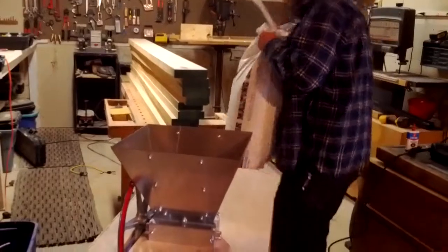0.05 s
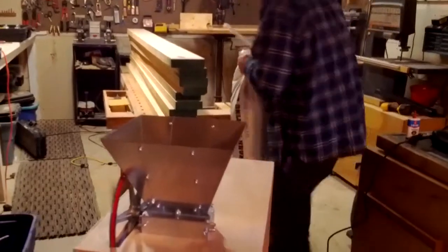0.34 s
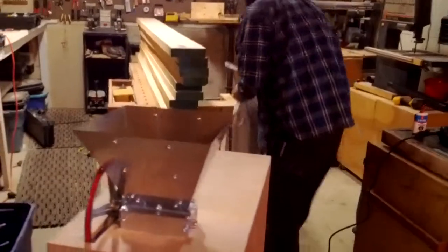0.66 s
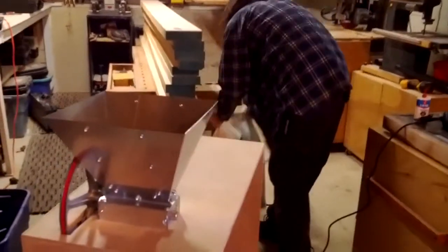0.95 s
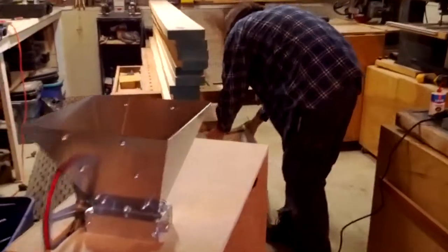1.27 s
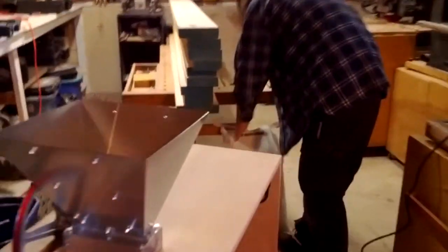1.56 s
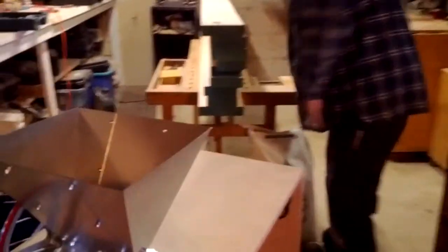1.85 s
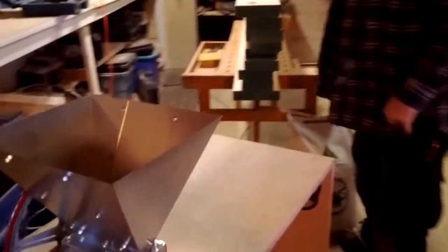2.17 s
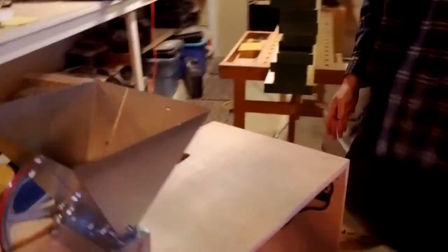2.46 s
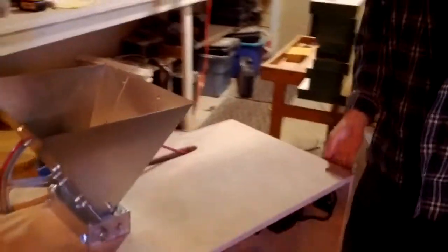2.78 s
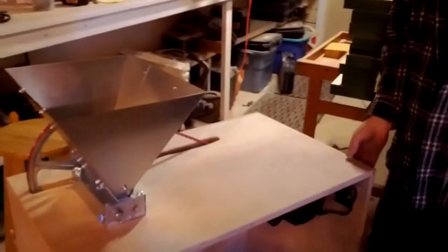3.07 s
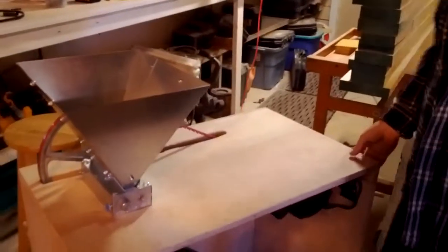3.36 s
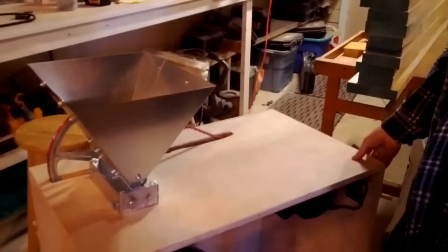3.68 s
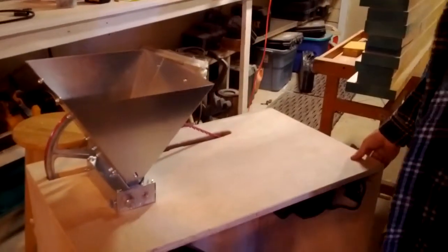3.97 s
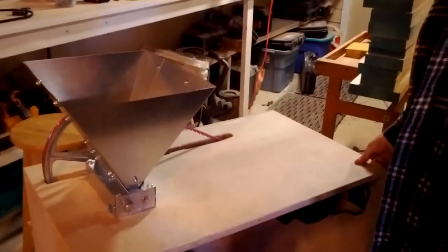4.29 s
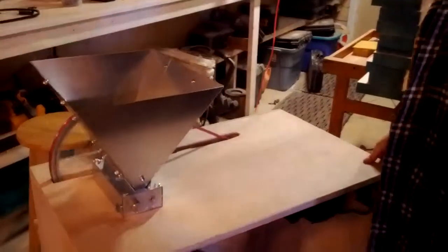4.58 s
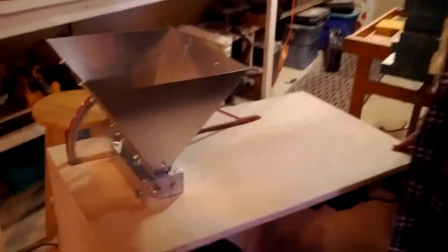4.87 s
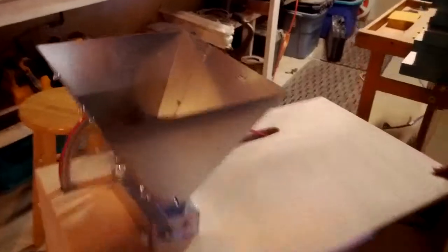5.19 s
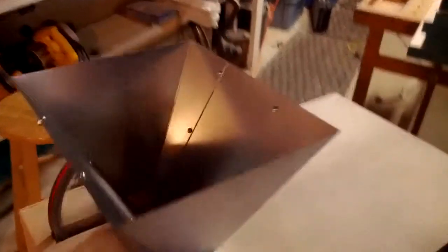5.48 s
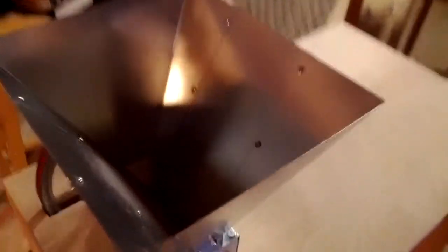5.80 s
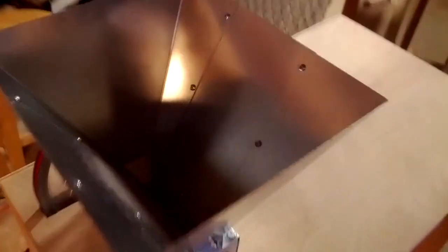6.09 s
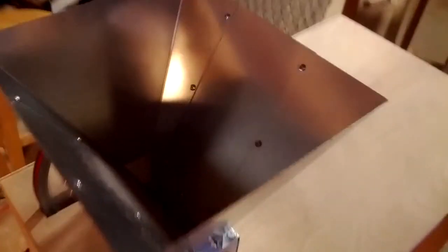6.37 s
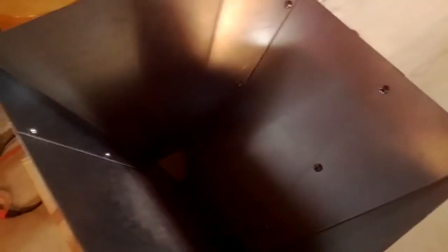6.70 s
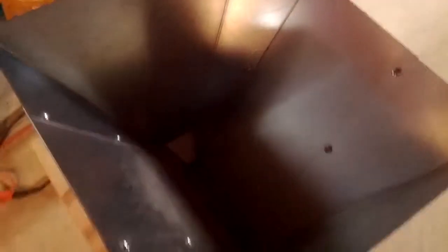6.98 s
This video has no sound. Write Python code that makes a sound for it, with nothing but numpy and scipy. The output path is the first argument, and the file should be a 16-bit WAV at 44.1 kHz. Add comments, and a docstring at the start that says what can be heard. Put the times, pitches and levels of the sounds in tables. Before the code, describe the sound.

Paper rustling in a workshop, then a small motor-driven mill briefly crushes grain, its metal hopper rattling, and is switched off.

```python
"""A workshop, with a low drone and a faint whine in the air. A paper sack crinkles and is set down, its
grain sliding with a rush. A hand feels along the bench and a roller mill starts with a clack. Its motor
hums while the rollers crush a handful of kernels: husks crunch, the sheet-metal hopper rattles and
rings. The feed thins to single cracks; switched off, the mill cracks a few more as it coasts."""
import sys
import numpy as np
from scipy import signal
from scipy.fft import rfft, irfft, next_fast_len
from scipy.io import wavfile
from scipy.ndimage import uniform_filter1d, minimum_filter1d, map_coordinates

SR = 44100
rng = np.random.default_rng(int(sys.argv[2]) if len(sys.argv) > 2 else 0)


def persist_wave(psi):
    """Save psi, clipped to +-1, as 16-bit WAV."""
    counts = np.round(np.clip(psi, -1, 1) * 32767).astype(np.int16)
    wavfile.write(sys.argv[1], SR, np.atleast_2d(counts).T)


N = 319284

# Levels in the cue tables are relative: each layer is trimmed where it is played.
# swells of the whine's lower note: t/s, level/dB, hold/s
WHINE_SWELLS = [(.72, -51, .22), (1.665, -51.5, 0.64), (2.13, -49.5, 0.28), (2.62, -51, .22)]
# reverb time of the shop: f/Hz, t60/s
ROOM_DECAY = [(150, 0.51), (1000, 0.25), (3000, 0.12), (12000, 0.059)]
# fingers tapping the bench: t/s, level/dB
FINGER_TAPS = [(2.826, -28), (2.899, -25), (2.946, -26.5), (2.985, -24), (3.092, -27)]
# a sleeve sliding: t/s, level/dB, hold/s
SLEEVE_SLIDES = [(2.25, -50.5, 0.2), (3.51, -48, 0.11), (3.66, -51, 0.11), (3.895, -42, .035)]
# strokes of paper and cloth: t/s, level/dB, rise/s, t60/s
BRUSH_STROKES = [(0.534, -32, 0.013, 0.23), (2.694, -33, .004, 0.11), (2.705, -30, 0.017, 0.19),
                 (2.983, -46, 0.0046, .08), (3.17, -41.5, 0.026, 0.11), (4.318, -35, 0.0041, 0.97)]
# moves of the sack, the last its landing as the grain slumps: t/s, level/dB, rise/s, hold/s, t60/s
SACK_MOVES = [(.005, -42, 0.012, 0.25, 1), (.3, -46.5, 0.024, .04, 0.99), (0.532, -35, 0.15, 0.13, 0.81),
              (0.856, -35, 0.12, 0.17, 0.47), (1.046, -16.5, 0.056, 0.032, 0.7)]
# paper snaps and small ticks: t/s, snap level/dB, thud level/dB
PAPER_SNAPS = [(.037, -26, -54), (0.087, -14.5, -40), (.12, -7, -35), (.124, -13, -51), (0.1795, -6, -48),
               (0.225, -30, -28.5), (2.41, -27, -55)]
# the power switch, on then off: t/s, clack level/dB, click level/dB, thump level/dB
SWITCH_THROWS = [(4.385, -8, -8.5, -15), (6.704, -6.5, -4.5, -2.5)]
# grain through the rollers takes hold, runs full and thins out: t/s, level/dB
GRAIN_FEED = [(4.42, -26.5), (4.83, -26.5), (4.92, -15), (5.55, -14.5), (6.02, -15.5), (6.09, -24.5),
              (6.22, -27), (6.4, -36), (6.62, -38), (7.0, -45), (7.24, -55)]
# bunches of kernels drawn in together: t/s, level/dB, hold/s
KERNEL_BUNCHES = [(4.446, -20, 0.11), (4.6, -24, 0.069), (5.271, -11, 0.05), (5.473, -7, 0.037),
                  (5.598, -13, .03), (5.653, -4.5, 0.032), (5.803, -15, .05), (6.03, -18, 0.032),
                  (6.476, -14.5, 0.026)]
# single kernels bursting: t/s, level/dB, ring f/Hz
KERNEL_CRACKS = [(4.616, -7.5, 1730), (4.849, -3, 990), (5.0665, 1, 1070), (5.398, 0, 1017),
                 (5.413, 6, 1420), (5.5837, -6, 1250), (5.663, 18, 1796), (5.777, 11, 2180),
                 (5.889, 9.5, 2100), (5.93, 2, 1065), (5.9818, 9.5, 1710), (6.03, 1, 2010),
                 (6.054, -5, 996), (6.104, -11, 1420), (6.129, -9.5, 970), (6.1487, -5.5, 1890),
                 (6.165, -7.5, 1192), (6.2396, -8, 2020), (6.2603, -6.5, 1340), (6.28, -3, 1073),
                 (6.333, 5, 2150), (6.362, -4.5, 991), (6.404, -13, 1057), (6.426, -8, 1420),
                 (6.468, -4, 1206), (6.497, -5.5, 1240), (6.57, -14, 1700), (6.6214, 2.5, 1685),
                 (6.813, -22, 1220), (6.835, -19, 1076), (6.8956, -12.5, 985), (6.9513, -11, 1680),
                 (7.0316, -7, 1330), (7.045, -14, 1190), (7.222, -5.5, 1830)]

# tone of each source as an EQ curve: f/Hz, level/dB
ROOM_TONE_EQ = [(12, -85), (20, -11), (65, -7.5), (86, -17.5), (123, -2.5), (193, -13), (222, -9),
                (485, -21), (802, -24.5), (1060, -23.5), (1150, -24.5), (1760, -25.5), (2910, -32),
                (11800, -40), (16000, -48)]
FINGER_EQ = [(200, -3), (700, 1), (1800, 3), (3800, 0), (6000, -6), (9000, -12), (12500, -4), (16000, -14)]
SLEEVE_EQ = [(5000, -26), (9000, -11), (10500, 2), (12500, -1), (14000, -8), (16000, -5)]
BRUSH_EQ = [(400, -29), (1500, 0), (3000, -6), (7000, 0), (11000, 5.5), (13000, 1), (16000, -18)]
SCUFF_EQ = [(700, -18), (1550, -1), (2500, -14), (9000, -29)]
RUSTLE_EQ = [(60, -17), (160, 2), (450, 0), (520, -6.5), (750, 1.5), (1300, 2), (1950, 5.5), (3000, -3),
             (4000, -1.5), (6000, -2), (11500, -1), (13500, -6.5), (16000, -20)]
SNAP_EQ = [(300, -24), (1200, -12), (1900, 8.5), (3000, -6), (4500, 3), (6500, 1.5), (11000, 4),
           (13500, -1), (16000, -41)]  # paper snaps and the switch's click
RUMBLE_EQ = [(30, -32), (68, -14), (100, 4), (150, -23), (220, -6.5), (400, -3.5), (540, -5), (650, -9.5),
             (1200, -17), (4000, -31.5)]  # rollers and the sack's thuds
THUMP_EQ = [(60, -34), (150, -12.5), (220, 16), (300, -2.5), (600, -4.5), (2000, -19)]
STEEL_EQ = [(50, -34), (200, -6), (550, -4), (830, -9.5), (950, -1.5), (1400, 0), (2100, -2.5),
            (2500, -13.5), (3200, -16), (5000, -12.5), (12000, -51)]
HUSK_EQ = [(1000, -12), (3000, -5), (5300, -5), (6400, -4), (7000, -0.5), (8900, 2), (9900, 0.5),
           (11100, 4.5), (13000, -2), (14300, -3), (16000, -17.5)]
CRACK_EQ = [(1000, -32), (2700, 1.5), (3800, -12.5), (5500, -0.5), (8000, -0.5), (10500, 2), (13000, 1),
            (15000, -6.5), (16000, -20)]

# resonances of the room tone, wooden bench, and hopper with mill body: f/Hz, width/Hz, lift/dB
ROOM_TONE_PEAKS = [(160.8, 12.5, 7.4), (454, 79, 5.8), (11170, 2000, 7.7)]
BENCH_MODES = [(203, 16, 12), (271.8, 42, 13.5), (317, 48, 7.5), (437, 87, 8), (505, 7.4, -3)]
HOPPER_MODES = [(780, 76, 5.5), (1016, 144, 5.5), (1030, 79, -1), (1254, 40, -0.5), (1369, 6.7, 5.5),
                (1706, 37, 4.5), (1950, 46, 0.5), (1950, 10, 3.5), (2200, 140, 4), (2540, 110, 10.5),
                (2770, 28, 6)]

ON_S, OFF_S = 4.4, 6.71  # the motor is powered between these times
HUM_HZ, BENCH_DRONE_HZ = 121.05, 193.4
SLIP_BEAT_HZ, SLIP_DIP_S, SLIP_DEPTH = 1.6, 5.68, 0.65  # the hum's beat: rate, time of one dip, depth
RATTLE_SLOPE, RING_SLOPE = 0.56, 0.8  # dB of steel per dB of crunch, and per dB of a single crack


def amp(db):
    """Decibels to gain."""
    return 10 ** (np.asarray(db) / 20)


def unit(x):
    """Scale to rms 1."""
    return x / np.sqrt(np.mean(x ** 2) + 1e-20)


def clock():
    """The time of each sample."""
    return np.arange(N) / SR


def along(points, hz):
    """Read (f/Hz, value) points on a log axis."""
    f, values = np.transpose(points)
    return np.interp(np.log(hz + 1), np.log(f + 1), values)


def fader(points):
    """A fader ride through (t/s, level/dB) points, silent outside them."""
    s, db = np.transpose(points)
    gate = uniform_filter1d(((clock() >= s[0]) & (clock() <= s[-1])) * 1., size=400)
    return np.abs(gate) * amp(np.interp(clock(), s, db))


def fading(start, db_per_s):
    """Gain 1 until start, then a steady fall."""
    return amp(-db_per_s * np.maximum(clock() - start, 0))


def burst(start, rise, hold, t60):
    """An envelope that rises and, hold seconds after its start, dies away."""
    t = np.arange(int((hold + 1.5 * t60) * SR)) / SR
    shape = np.clip(t / rise, 0, 1) * np.exp(-np.log(1000) * np.maximum(t - hold, 0) / t60)
    first = max(0, round(start * SR))
    return np.pad(shape, (first, max(0, N - first - len(t))))[:N]


def wobble(rate):
    """A smooth random curve, rate knots a second."""
    return map_coordinates(rng.standard_normal(int(N * rate / SR) + 4), [clock() * rate], order=2)


def grit(rate):
    """Tiny fractures at random, rate a second, rms 1."""
    return unit(rng.standard_normal(N) * (rng.random(N) < rate / SR))


def clumps(rate, scatter_db, t60):
    """Envelope of many overlapping bursts of uneven size over an unbroken trickle, rms 1."""
    onsets = rng.random(N) < rate / SR
    sizes = amp(scatter_db * np.clip(rng.standard_normal(N), -2, 2))
    power = signal.lfilter([1], [1, -np.exp(-2 * np.log(1000) / (t60 * SR))], onsets * sizes ** 2)
    return unit(np.sqrt(power + np.mean(power) / 2))


def coloured(x, eq, resonances=()):
    """Play x through a body of unit energy: a broad EQ with ringing peaks."""
    size = 2 ** 14
    hz = np.fft.rfftfreq(size, 1 / SR)
    peaks_db = sum(lift / (1 + (2 * (hz - f) / width) ** 2) for f, width, lift in resonances)
    cepstrum = irfft(np.log(amp(along(eq, hz) + peaks_db) + 1e-6))
    cepstrum[1:size // 2] *= 2  # minimum phase: the ring follows the hit
    cepstrum[size // 2 + 1:] = 0
    ring = irfft(np.exp(rfft(cepstrum)))
    return signal.fftconvolve(x, ring / np.linalg.norm(ring))[:N]


def patchy(x, depth_db, size):
    """Every fragment has its own pitch: brief random peaks, in frames of size samples."""
    frames = signal.stft(x, nperseg=size)[2]
    peaks = uniform_filter1d(rng.standard_normal(frames.shape), size=7, axis=0)
    peaks = unit(uniform_filter1d(peaks, size=3, axis=1))
    return signal.istft(frames * unit(amp(depth_db * peaks)), nperseg=size)[1][:N]


def room_tone():
    """The bed: steady air, a low throbbing drone that swells once, and a faint two-note whine."""
    t = clock()
    air = amp(-37) * coloured(rng.standard_normal(N), ROOM_TONE_EQ, ROOM_TONE_PEAKS)
    swell = amp(-49) + amp(-43) * burst(1.5, rise=0.44, hold=0.69, t60=0.88)
    throb = amp(0.87 * wobble(rate=9))
    drone = swell * throb * np.sin(2 * np.pi * 124 * t + 0.61 * wobble(rate=10))
    lower = sum(amp(db) * burst(s, rise=0.065, hold=hold, t60=0.34) for s, db, hold in WHINE_SWELLS)
    upper = amp(-58.5 + 2.5 * wobble(rate=2.22))
    whine = sum(gain * np.sin(2 * np.pi * hz * t + 0.31 * wobble(rate=20))
                for gain, hz in ((lower, 1085), (upper, 1715)))
    return air + np.sqrt(2) * (drone + whine)


def shop_reverb(x):
    """The short tail of the cluttered shop; it changes as the listener moves about."""
    step, predelay = SR // 3, SR // 300
    blocks = np.pad(x, (0, -N % step)).reshape(-1, step)  # each block gets its own tail
    hz, t, noise = signal.stft(rng.standard_normal(blocks.shape), SR, nperseg=256)
    decay = np.exp(-np.log(1000) * t / along(ROOM_DECAY, hz)[:, None])
    tails = signal.istft(noise * decay, SR)[1][:, :step]
    tails = np.pad(tails / np.linalg.norm(tails[0]), ((0, 0), (1, 0)))
    echoes = signal.fftconvolve(blocks, tails, axes=1)
    spill = np.pad(echoes[:, step:].ravel(), (step, 0))[:N]
    return np.pad(echoes[:, :step].ravel()[:N] + spill, (predelay, 0))[:N]


def hand():
    """A hand feels along the bench for the switch: fingers tap, the sleeve slides with a thin hiss."""
    taps = sum(amp(db - 8) * burst(s, rise=0.0004, hold=0.0014, t60=0.01) for s, db in FINGER_TAPS)
    slides = sum(amp(db) * burst(s, rise=0.025, hold=hold, t60=0.2) for s, db, hold in SLEEVE_SLIDES)
    return coloured(taps * grit(rate=13000), FINGER_EQ) + coloured(slides * grit(rate=12000), SLEEVE_EQ)


def brushes():
    """Short, bright strokes of paper and cloth, and one dull scuff."""
    strokes = sum(amp(db) * burst(s, rise, rise * 1.3, t60) for s, db, rise, t60 in BRUSH_STROKES)
    scuff = amp(-39.5) * burst(3.162, rise=0.008, hold=0.014, t60=0.04)
    return strokes * coloured(grit(rate=8500), BRUSH_EQ) + scuff * coloured(grit(rate=5500), SCUFF_EQ)


def sack():
    """Paper creases and snaps while the grain slides inside it."""
    moves = sum(amp(db) * burst(s, rise, hold, t60) for s, db, rise, hold, t60 in SACK_MOVES)
    rustle = moves * clumps(rate=760, scatter_db=-1, t60=0.068) * coloured(grit(rate=9900), RUSTLE_EQ)
    snaps = sum(amp(db - 8) * burst(s, rise=0.000088, hold=0.00071, t60=0.0035)
                for s, db, _ in PAPER_SNAPS)
    thuds = sum(amp(db + 5) * burst(s, rise=0.0007, hold=0.0019, t60=0.011) for s, _, db in PAPER_SNAPS)
    crinkle = coloured(snaps * grit(rate=18000), SNAP_EQ) + coloured(thuds * grit(rate=5400), RUMBLE_EQ)
    return rustle + patchy(crinkle, depth_db=-3.5, size=256)


def emptying(loaded_db, free_db):
    """A gain that glides between two levels as the hopper runs low and the load leaves the rollers."""
    start_s, length_s = 5.14, 0.77
    progress = np.clip((clock() - start_s) / length_s, 0, 1)
    return amp(loaded_db + (free_db - loaded_db) * progress)


def motor():
    """Mains hum beats against the slipping rotor; belt and rollers drone and rumble in the bench."""
    t = clock()
    powered = burst(ON_S, rise=0.085, hold=OFF_S - ON_S, t60=0.39)
    turning = (t > ON_S) * fading(OFF_S, db_per_s=17)  # coasts once the power is off
    inrush = amp(-25.5) * burst(ON_S, rise=0.1, hold=0.26, t60=0.16)  # surge while getting up to speed
    mains = emptying(loaded_db=-32, free_db=-27.5)
    phase = 2 * np.pi * HUM_HZ * t + 0.11 * wobble(rate=12)
    rotor = SLIP_DEPTH * np.sin(phase - 2 * np.pi * SLIP_BEAT_HZ * (t - SLIP_DIP_S))
    harmonics = emptying(-30, -23) * (np.sin(3 * phase) + amp(-15) * np.sin(2 * phase))
    hum = (mains + inrush) * np.sin(phase) - mains * rotor + harmonics
    drone = emptying(-28.5, -44) * np.sin(2 * np.pi * BENCH_DRONE_HZ * t + 1.2 * wobble(rate=19))
    # the slowing rollers shudder against a last kernel
    shudder = amp(-33.5) * burst(7.175, rise=0.043, hold=0.07, t60=0.1)
    rolling = emptying(-23, -24.5) * turning + shudder
    rumble = rolling * coloured(grit(rate=1500), RUMBLE_EQ, BENCH_MODES)
    load = amp(1.8 * wobble(rate=20))
    return np.sqrt(2) * powered * (hum + drone) * load + rumble


def switch():
    """The switch clacks and the motor jolts the bench."""
    clack = click = thump = 0
    for s, clack_db, click_db, thump_db in SWITCH_THROWS:
        hit = burst(s, rise=0.0012, hold=0.0047, t60=0.094)
        clack += amp(clack_db) * hit
        click += amp(click_db) * hit
        thump += amp(thump_db) * hit
    return (coloured(clack * grit(rate=8300), STEEL_EQ, HOPPER_MODES)
            + coloured(click * grit(rate=5200), SNAP_EQ)
            + coloured(thump * grit(rate=3000), THUMP_EQ))


def hopper(rattle):
    """Sheet steel rattles with the feed, and each single crack rings it near a pitch of its own."""
    t, wander = clock(), 1.28 * wobble(rate=200)
    clatter = pings = 0
    for s, db, hz in KERNEL_CRACKS:
        ring = amp(RING_SLOPE * db) * burst(s, rise=0.0027, hold=0.015, t60=0.049)
        clatter += amp(-16) * ring
        pings += amp(-17) * ring * np.sin(2 * np.pi * hz * t + wander)
    hits = patchy(rattle + clatter * grit(rate=9000), depth_db=0.5, size=1024)
    bare = emptying(0, 2.5)  # the steel rings more freely once grain no longer covers it
    return bare * (coloured(hits, STEEL_EQ, HOPPER_MODES) + pings)


def crushing():
    """Kernels burst in sprays of tiny fractures. Two stems: crunching husks and the hopper's steel."""
    bunches = sum(amp(db - 2.5) * burst(s, rise=0.036, hold=hold, t60=0.066)
                  for s, db, hold in KERNEL_BUNCHES)
    feed = fader(GRAIN_FEED) + bunches
    kernels = clumps(rate=200, scatter_db=4.5, t60=0.063)
    crunch = patchy(amp(1.5) * feed * kernels * grit(rate=13000), depth_db=2, size=256)
    loose_grain = fading(start=6.29, db_per_s=20)  # the last of it leaves the hopper
    rattle = amp(-7.5) * feed ** RATTLE_SLOPE * loose_grain * kernels * grit(rate=7000)
    singles = sum(amp(db - 6.5) * burst(s, rise=0.00093, hold=0.0062, t60=0.041)
                  for s, db, _ in KERNEL_CRACKS)
    cracks = patchy(singles * grit(rate=18000), depth_db=3, size=256)
    return coloured(crunch, HUSK_EQ) + coloured(cracks, CRACK_EQ), hopper(rattle)


def scene():
    """The mono mix beside the mill; the hopper's wide walls feed the room most."""
    husks, steel = crushing()
    foley = sack() + brushes() + hand()
    clacks = switch()
    send = amp(-10.5) * foley + amp(-15.5) * husks + amp(-8) * steel + amp(-12) * clacks
    return (foley + husks + steel + clacks + shop_reverb(send) + motor() + room_tone())[None]


def record(dry):
    """A fast limiter holds down the loudest cracks; a steep low-pass takes off the very top."""
    ceiling, cutoff_hz = 0.8, 15800
    needed = np.minimum(1, ceiling / (np.abs(dry) + 1e-9))
    limited = dry * uniform_filter1d(minimum_filter1d(needed, size=15), size=11)
    size = next_fast_len(N + SR // 2)
    passband = np.fft.rfftfreq(size, 1 / SR) < cutoff_hz
    return irfft(rfft(limited, size) * passband, size)[:, :N]


dry = scene()
out = record(dry)
persist_wave(out)
```